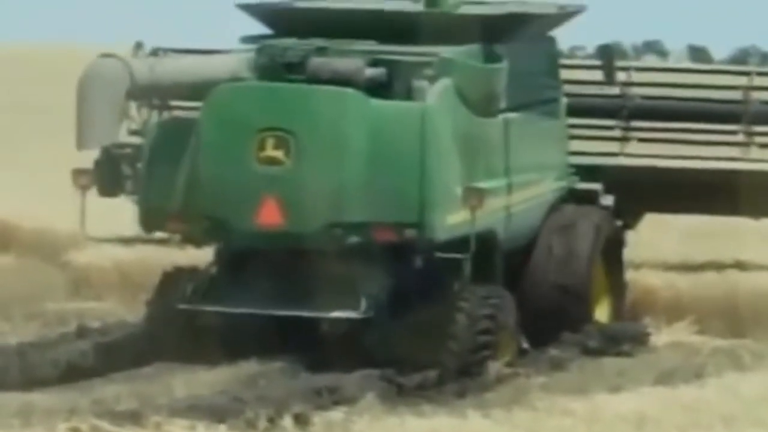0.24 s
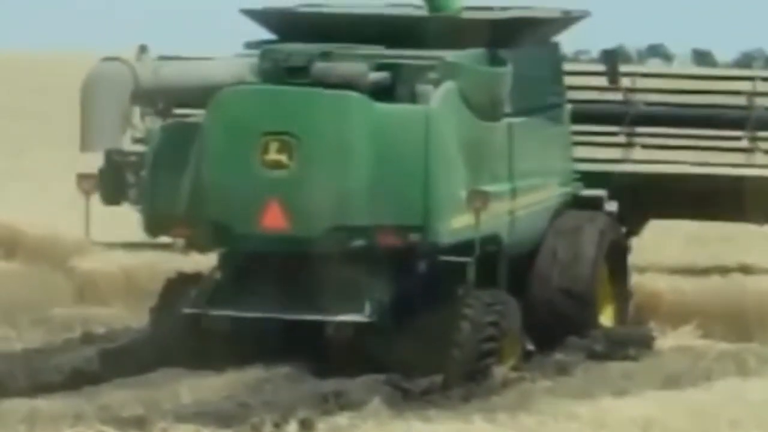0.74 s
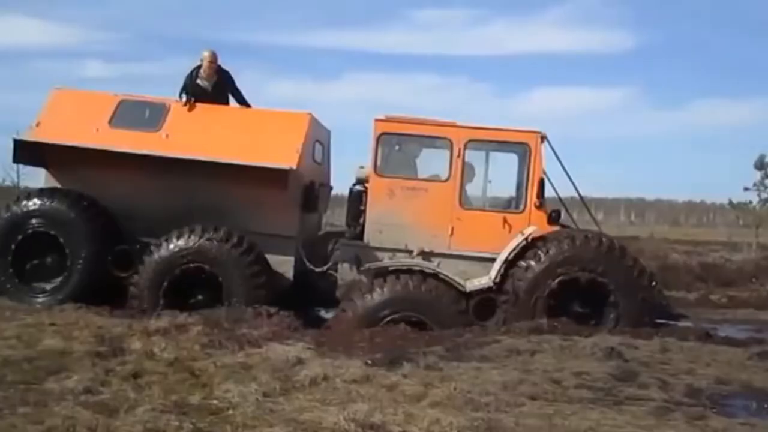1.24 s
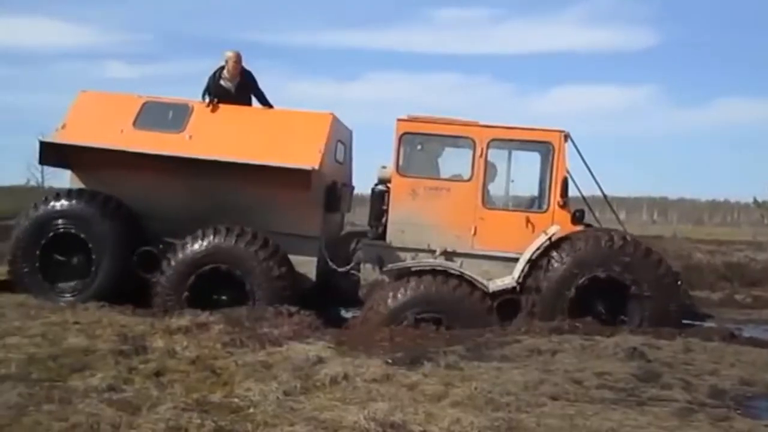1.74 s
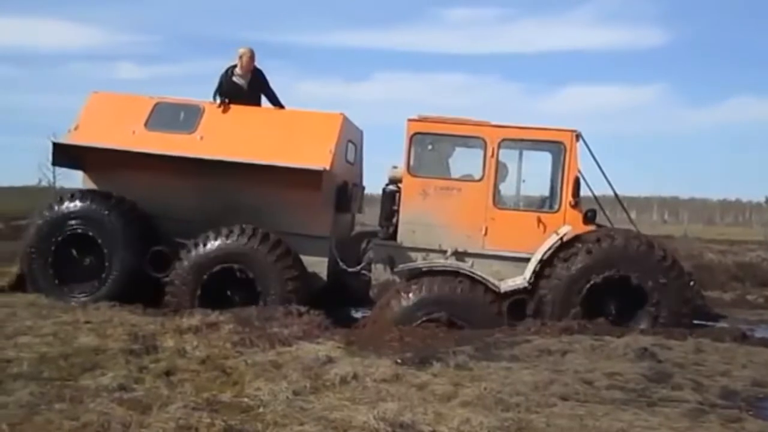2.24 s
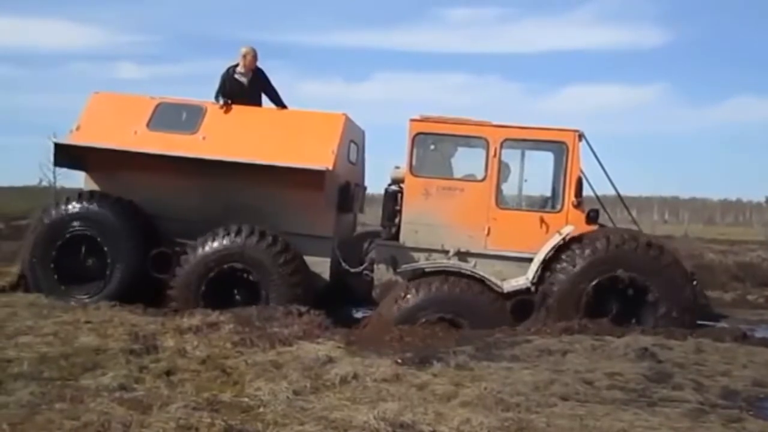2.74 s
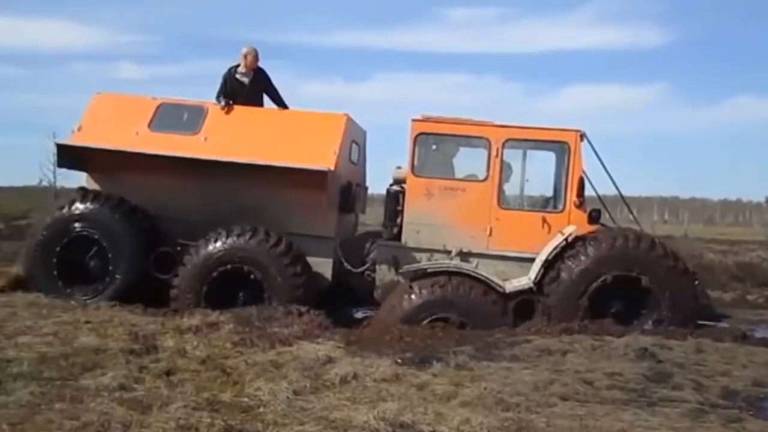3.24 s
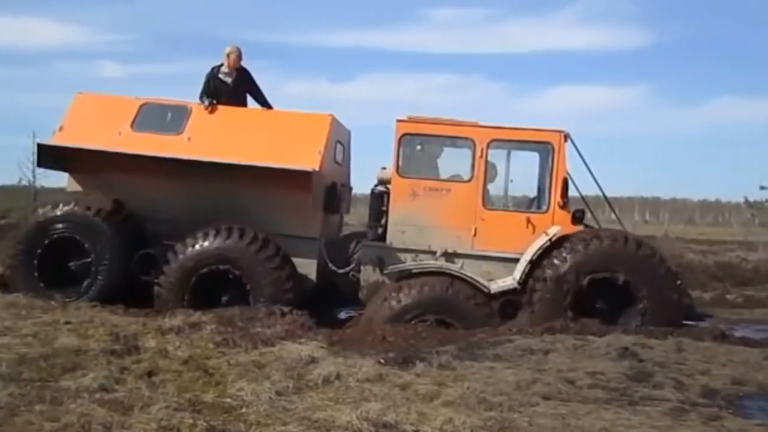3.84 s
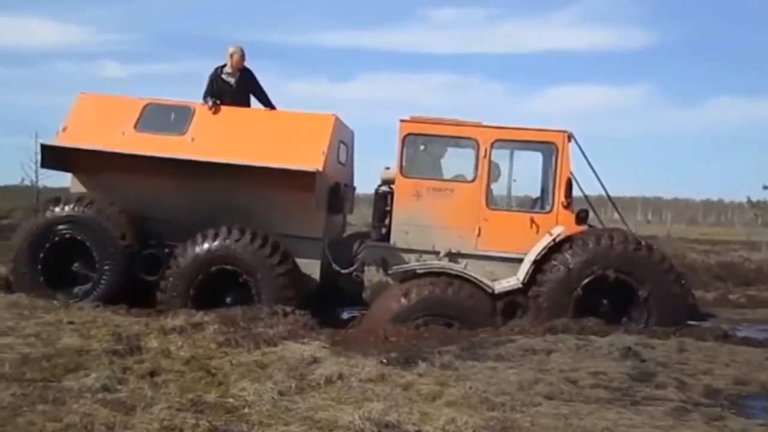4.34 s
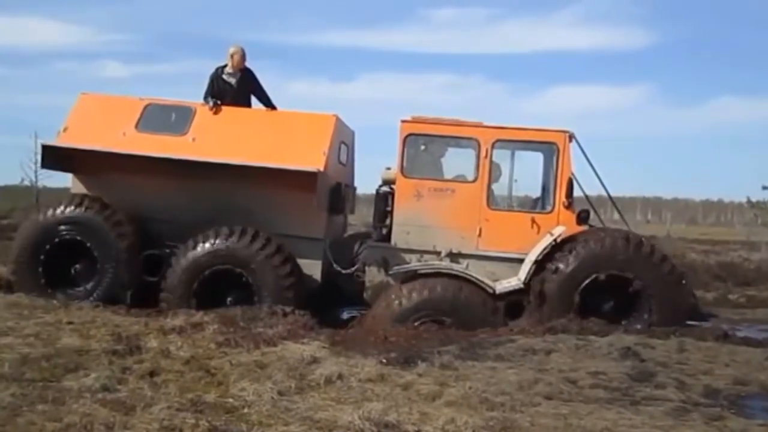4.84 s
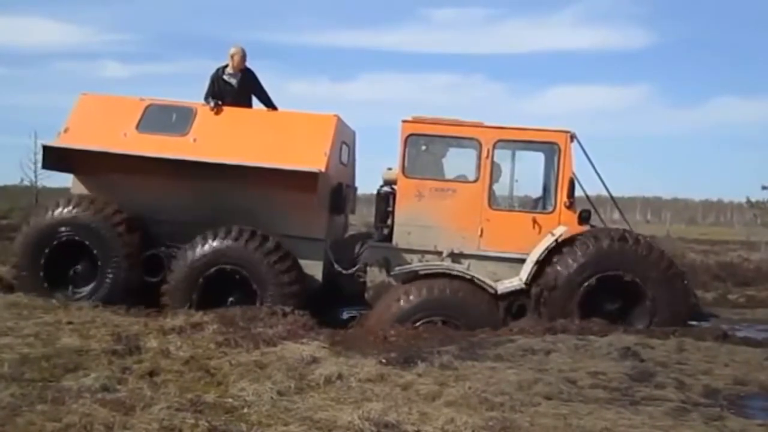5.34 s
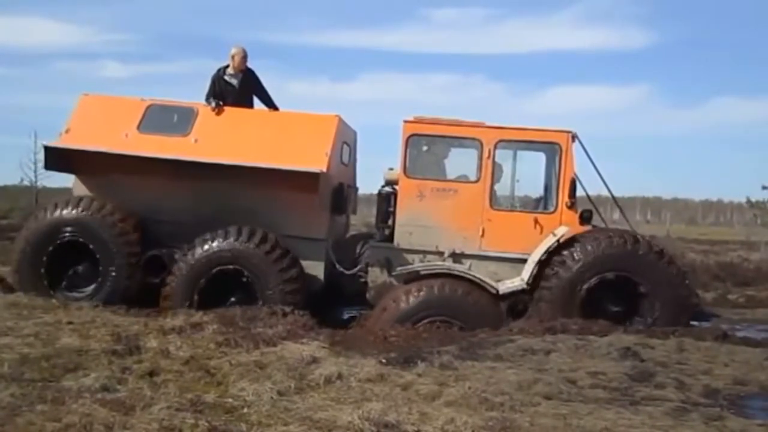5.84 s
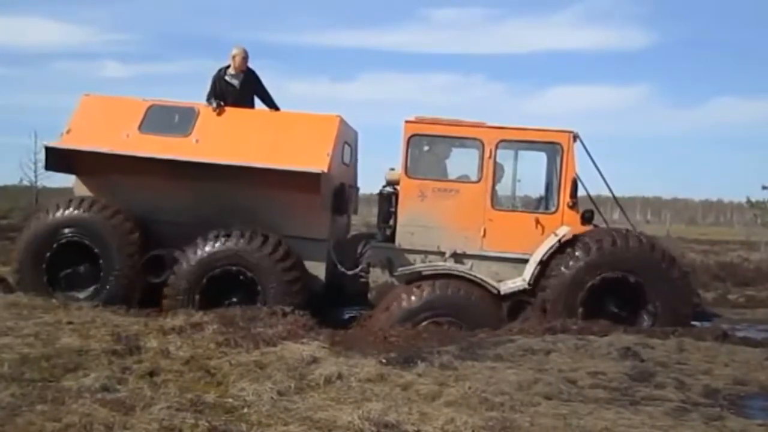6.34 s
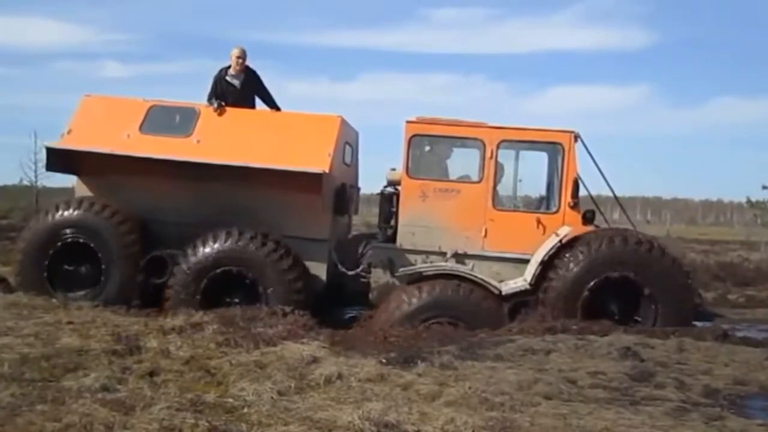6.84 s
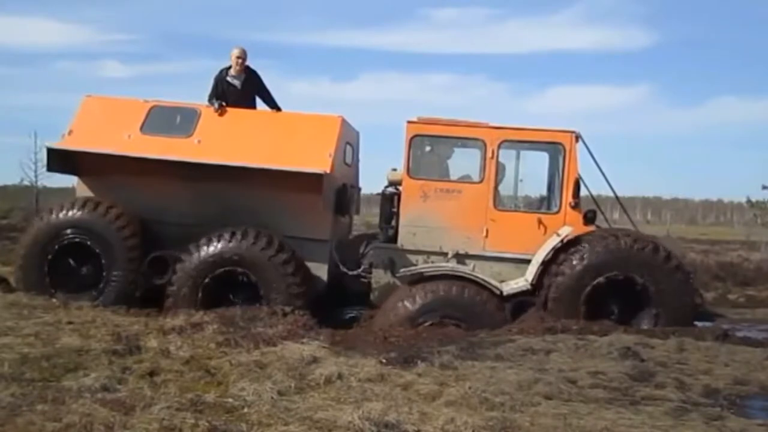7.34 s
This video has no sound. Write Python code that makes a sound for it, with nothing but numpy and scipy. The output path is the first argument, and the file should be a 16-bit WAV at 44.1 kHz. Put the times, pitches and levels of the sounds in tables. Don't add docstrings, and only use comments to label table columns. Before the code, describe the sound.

First, a dense, gritty, narrow-band roar of a heavy farm machine, rumbling without pause. A sudden cut with a thump brings a faint all-terrain vehicle engine outdoors, its revs rising, dipping, rising higher, then sagging under load. Hollow plastic knocks and small rattles on the camera stand out early, with low wind puffs and tiny mud spats. Later the level opens up and gusts batter the microphone port.

```python
import sys
import numpy as np
from scipy import signal
from scipy.fft import rfft, irfft, next_fast_len
from scipy.io import wavfile
from scipy.ndimage import uniform_filter1d, map_coordinates

SR = 44100
rng = np.random.default_rng(int(sys.argv[2]) if len(sys.argv) > 2 else 0)


def int16_out(signal):
    q = np.round(np.clip(np.atleast_2d(signal).T, -1, 1) * 32767)
    wavfile.write(sys.argv[1], SR, q.astype(np.int16))


def makeup_ratio(level_db):
    decades = np.asarray(level_db, float) / 20
    return 10 ** decades


N = 334703


def unit(x):
    return x / np.sqrt(np.mean(x ** 2) + 1e-20)


def along(points, hz):
    point_hz, point_db = np.transpose(points)
    return makeup_ratio(np.interp(np.log(hz + 1), np.log(point_hz + 1), point_db))


def curves(rows):
    time_s, *columns = np.transpose(rows)
    return [np.interp(np.arange(N) / SR, time_s, column) for column in columns]


def wobble(rate_hz):
    coarse = np.arange(0, N + 32, 32)
    knots = rng.standard_normal(int(N * rate_hz / SR) + 4)
    return np.interp(np.arange(N), coarse, map_coordinates(knots, [coarse * rate_hz / SR]))


def filtered(x, response):
    size = next_fast_len(N + 8192)
    return irfft(rfft(x, size) * response(np.fft.rfftfreq(size, 1 / SR)), size)[:N]


def modes(rows, hz):
    powers = [makeup_ratio(db) ** 2 / (1 + (2 * (hz - centre) / width) ** 2) ** 2 for centre, width, db in rows]
    return np.sqrt(sum(powers))


def noise(response):
    return unit(filtered(rng.standard_normal(N), response))


def steady(x, span_s):
    power = np.abs(uniform_filter1d(x ** 2, round(span_s * SR)))
    return x / np.sqrt(power + 1e-9)


def add(x, start_s, burst):
    part = x[round(start_s * SR):][:len(burst)]
    part += burst[:len(part)]


# pitch_hz, level_db per Hz
PORT = [(12, -48), (20, -6), (64, 4.5), (97, 3), (129, 2.5), (330, -6), (687, -26), (780, -41), (900, -21),
        (1170, -54), (1980, -120)]
# pitch_hz, level_db per Hz
WHIP = [(60, -60), (120, -13), (250, 13), (500, -16), (800, -20), (1300, -34), (3000, -120)]
# start_s, level_db, hold_s
GUSTS = [(1.222, -27, .005), (1.498, -31, 0.11), (1.75, -43, .25), (2.15, -41, .3), (3.9, -37, .35),
         (5.575, -27, .01), (5.708, -26, 0.057), (5.85, -27, .12), (6.0, -30, 0.11), (6.182, -24, .01),
         (6.335, -23, 0.03), (6.444, -22.5, 0.17), (6.667, -22, 0.043), (6.76, -24, .03), (7.22, -36, .2),
         (7.5, -34, .05)]
# start_s, peak_db, pitch_hz
THUMPS = [(1.246, -32, 201), (1.261, -29, 190), (1.274, -26, 150), (1.294, -24, 130), (2.125, -21, 40),
          (2.526, -17, 36), (4.21, -17, 40), (6.757, -7.5, 177), (2.115, -17.5, 61.9), (2.149, -17.5, 95),
          (2.218, -20.5, 61.5), (2.328, -18.5, 86.1), (2.533, -12, 76.5), (2.551, -19, 122),
          (2.662, -18.5, 142), (2.739, -25, 136), (4.19, -24, 61.9), (4.262, -8.5, 128), (4.287, -11, 90),
          (5.122, -18, 81.5), (5.839, -7, 132), (6.321, -15, 125)]
RISE_DB_PER_S, FALL_DB_PER_S, CALM_DB = 205, 172, -45


def gust_level(start_s, db, hold_s):
    climb_s, fall_s = (db - CALM_DB) / RISE_DB_PER_S, (db - CALM_DB) / FALL_DB_PER_S
    end_s = start_s + hold_s
    corners_s = [start_s - climb_s, start_s, end_s, end_s + fall_s]
    return np.interp(np.arange(N) / SR, corners_s, [CALM_DB, db, db, CALM_DB])


def wind():
    port = lambda hz: along(PORT, hz)
    gust_db = np.max([gust_level(*gust) for gust in GUSTS], axis=0)
    breeze_db = .81 * (curves(GAIN)[0] + 35) - 38 + 1.84 * wobble(2.97)
    x = makeup_ratio(breeze_db) * unit(makeup_ratio(1.7 * wobble(18)) * noise(port))
    x += makeup_ratio(gust_db - 1) * steady(makeup_ratio(3 * wobble(90)) * noise(port), span_s=.066)
    lumps = makeup_ratio(2.4 * wobble(110)) * noise(lambda hz: along(WHIP, hz))
    x += makeup_ratio(1.95 * (gust_db + 19) - 27) * steady(lumps, span_s=.07)
    t, air = np.arange(SR // 5) / SR, steady(noise(port), span_s=.028)
    for start_s, db, hz in THUMPS:
        push = -np.sin(2 * np.pi * hz * t) + makeup_ratio(-9) * air[round(start_s * SR):][:len(t)]
        t60_s = .066 + 1.8 / hz
        add(x, start_s, makeup_ratio(db - 60 * t / t60_s) * (1 - np.exp(-t / .006)) * push)
    return x


# start_s, peak_db, way (push 1
SNAPS = [(5.553, -18, -1), (5.5656, -18, -1), (5.5773, -16, 1), (5.6955, -14, -1), (5.7182, -13, 1),
         (5.7339, -16, -1), (5.8439, -15, -1), (5.8575, -15, -1), (5.9347, -11, -1), (5.9959, -13, -1),
         (6.0572, -15, -1), (6.1244, -11, 1), (6.1541, -12, 1), (6.3149, -6, 1), (6.3408, -12, 1),
         (6.3566, -10, 1), (6.4603, -8, 1), (6.4726, -7, 1), (6.4979, -9, 1), (6.5273, -8, -1),
         (6.5637, -8, 1), (6.5963, -7, 1), (6.6149, -6, -1), (6.6462, -10, 1), (6.6673, -11, 1),
         (6.6843, -10, 1), (6.6986, -11, 1), (6.7683, -12, -1), (6.8669, -15, -1), (6.8821, -16, -1),
         (6.9144, -14, -1), (7.024, -17, 1), (7.0443, -15, -1), (7.141, -10, -1), (7.218, -15, -1),
         (7.2686, -13, -1), (7.3105, -14, 1), (7.3308, -13, -1), (7.4565, -12, -1), (7.4878, -12, -1),
         (7.515, -13, 1), (7.5292, -11, 1), (7.5611, -14, 1), (7.5874, -15, -1)]


def snaps():
    x, t = np.zeros(N), np.arange(SR // 20) / SR - .015
    for start_s, db, way in SNAPS:
        u = t * makeup_ratio(.4 * (db + 12))
        shape = np.exp(np.minimum(u / .0018, -u / .004))
        add(x, start_s + t[0], np.sign(way) * makeup_ratio(db + .5) * shape * np.cos(2 * np.pi * 140 * u))
    return x


# start_s, peak_db, first_pitch_hz
LICKS = [(5.856, -21, 500), (5.884, -22, 556), (5.894, -26, 450), (6.123, -22, 656), (6.352, -25, 450),
         (6.3115, -26, 580), (6.445, -31, 594), (6.504, -17, 597), (6.521, -17, 910), (6.559, -16, 800),
         (6.585, -19, 740), (6.608, -23.5, 1160), (6.644, -21, 666), (6.677, -25, 760), (6.718, -22, 550)]
LICK_S, LICK_END_HZ = .0075, 294


def licks():
    x, u = np.zeros(N), np.arange(round(LICK_S * SR)) / (LICK_S * SR)
    for start_s, db, hz in LICKS:
        phase = 2 * np.pi * np.cumsum(hz * (LICK_END_HZ / hz) ** u) / SR
        add(x, start_s - LICK_S * .25, makeup_ratio(db) * np.sin(np.pi * u) * np.sin(phase))
    return x


# start_s, peak_db
SPATTER = [(1.5308, -34), (1.537, -22.5), (1.6488, -49), (2.3466, -38), (2.588, -32.5), (2.785, -42),
           (3.154, -44), (3.181, -30), (3.213, -27.5), (3.4176, -29.5), (4.0916, -34), (4.8487, -25.5),
           (4.9308, -21.5), (5.278, -23), (5.4072, -27), (5.6065, -25.5), (5.714, -24), (5.77, -24.5),
           (5.86, -27.5), (5.9226, -16.5), (6.222, -21), (7.1672, -22.5), (7.388, -27.5)]


def spatter():
    x, t = np.zeros(N), np.arange(SR // 10) / SR
    for start_s, db in SPATTER:
        decay = makeup_ratio(db - 12.5 - 60 * t / .12) + makeup_ratio(db - 2.5 - 60 * t / .0053)
        add(x, start_s, decay * (1 - np.exp(-t / .00063)) * rng.standard_normal(len(t)))
    return filtered(x, lambda hz: along([(1500, -9), (4000, 5), (9000, -.5), (14000, -17)], hz))


def ring_down(t, hz, db, t60_s, rise_s, lag=0):
    swing = np.cos(2 * np.pi * hz * (t - 1.164 * rise_s) - lag)
    return makeup_ratio(db - 60 * t / t60_s) * (1 - np.exp(-t / rise_s)) * swing


# start_s, peak_db, low_modes_db, hardness (0-1)
KNOCKS = [(1.219, -7.5, -7, .5), (1.2347, -14, -3, 0), (1.5015, -16.5, 12, 0.1), (1.507, -4.5, 3, -.15),
          (1.537, -10, -19, 0.2), (1.544, -13.5, -14, 0.1), (1.555, -17.5, 13, 0.3), (1.5598, -15, 2, 0.4),
          (1.658, -27.5, 7, 0.9), (1.731, -22.5, -11, 0.1), (2.135, -25, 12, 0), (2.264, -35, 18, 0.2),
          (2.502, -24, 11, 0.4), (2.589, -22.5, -3, 0.8), (3.0988, -10, -1, 0.89), (3.209, -19, 8.5, 0.8),
          (3.6723, -14, -1, .9)]
# pitch_hz, level_db, share of t60
CASE_LOW = [(125.4, -3, 1.16), (190, -17, 2.2)]
# pitch_hz, share of t60
CASE_MID = (236, 0.93)
# pitch_hz, level_db, share of t60
CASE_HIGH = [(320, 8.5, 1.3), (380, 0, 0.74), (498, -15, 0.81), (602, -9.5, 0.98), (722, 7, 0.62),
             (950, 0.5, 0.46), (1103, -5, 1.5), (1430, -6, 0.76), (1700, -17.5, 0.75), (2080, -11, 0.96),
             (2470, -17, 0.36)]
# pitch_hz, level_db per Hz
RATTLE = [(80, -28.5), (200, 1.5), (900, -14.5), (2500, -16), (4000, -25), (8000, -27.5), (12000, -34.5),
          (15000, -55)]


def knocks():
    x, loose, t = np.zeros(N), np.zeros(N), np.arange(SR // 5) / SR
    for start_s, db, low_db, hard in KNOCKS:
        upper_db, rattle_db = -24.5 + 9.5 * hard, -32.5 + 13 * hard
        t60_s = .075 + .001 * db
        rise_s = np.clip(.0005 * makeup_ratio(-upper_db - 11.5), .0004, .003)
        body = ring_down(t, CASE_MID[0], -.45, t60_s * CASE_MID[1], rise_s)
        for hz, level_db, share in CASE_LOW:
            body += ring_down(t, hz, low_db + level_db, t60_s * share, rise_s, lag=1)
        upper = np.zeros(len(t))
        for hz, level_db, share in CASE_HIGH:
            detune, spread_db = 1 + .025 * rng.standard_normal(), rng.normal(0, 2)
            mode_db = upper_db + level_db + spread_db
            upper += ring_down(t, hz * detune, mode_db, t60_s * share * .7, rise_s, spread_db / 3)
        start_s = start_s - 1.5 * rise_s
        add(x, start_s, -makeup_ratio(db - 12) * np.hanning(round(.003 * SR)))
        add(x, start_s + .00319, makeup_ratio(db + 2.5) * (body + upper))
        add(x, start_s + .00303 + .0078, makeup_ratio(db + 3.5) * upper)
        shake = makeup_ratio(db + rattle_db + 29 - 60 * t / (.45 * t60_s))
        add(loose, start_s + .0027, shake * rng.standard_normal(len(t)))
    return x + filtered(loose, lambda hz: along(RATTLE, hz))


# start_s, level_db, pitch_hz, t60_s
CLINKS = [(1.221, -21, 990, 0.066), (1.5555, -23.5, 824, .05), (1.556, -26, 1495, 0.057),
          (1.557, -28.5, 1200, 0.058), (1.558, -35, 1700, 0.036), (1.561, -29.5, 950, 0.061),
          (2.59, -27.5, 777, 0.064), (3.1005, -26.5, 2080, .018), (3.102, -24, 1446, 0.02),
          (3.105, -23, 764, 0.025), (3.119, -18.5, 920, 0.027), (3.216, -25.5, 946, 0.041),
          (3.675, -29, 2044, .04), (3.682, -19.5, 712, 0.041), (6.378, -21.5, 1300, 0.035),
          (6.447, -18, 1313, 0.054)]


def clinks():
    x, t = np.zeros(N), np.arange(SR // 8) / SR
    for start_s, db, hz, t60_s in CLINKS:
        drift = np.cumsum(rng.standard_normal(len(t))) * .07
        envelope = makeup_ratio(db - 60 * t / t60_s) * (1 - np.exp(-t / .0011))
        add(x, start_s, envelope * np.sin(2 * np.pi * hz * t + drift))
    return x


# start_s, length_s, pitch_hz, level_db
CHIRPS = [
    (0.00194, 0.074, 2200, -38.5),
    (.55, 0.12, 3000, -47.5),
    (.8, .12, 2710, -49),
    (1.1, .1, 3000, -50),
    (.2, .1, 2360, -58),
    (0.077, 0.079, 2500, -44),
]


def chirps():
    x = np.zeros(N)
    for start_s, length_s, hz, db in CHIRPS:
        t = np.arange(round(length_s * SR)) / SR
        add(x, start_s, makeup_ratio(db) * np.sqrt(np.sin(np.pi * t / length_s)) * np.sin(2 * np.pi * hz * t))
    return x


def wavering(rows, swing_db):
    x = np.zeros(N)
    for hz, wander_hz, db in rows:
        phase = 2 * np.pi * np.cumsum(hz + wander_hz / 2 * wobble(30)) / SR
        x += makeup_ratio(db + 3 + swing_db * wobble(23)) * np.sin(phase)
    return x


# order, level_db, lag in radians
DRUM = [(2, -16, 2.3), (3, -21, 6), (4, -40, 4.8), (5, -36, .9), (6, -15, 3.3), (7, -37, 5.7),
        (8, -27, 2.2), (10, -38, 3.8), (12, -22.5, 4), (15, -33, .5), (18, -27, 4), (20, -35, 5.7),
        (24, -34, 4.5)]
# pitch_hz, wander_hz, level_db
ROTOR = [(77.9, .5, -23), (118.5, .7, -29), (163.6, .8, -28), (179.9, 1, -32)]
# pitch_hz, wander_hz, level_db
WHINE = [(328.4, 2.5, -35), (401, 6, -43), (538.5, 14, -43), (694, 16, -44), (872.5, 2, -34.5),
         (1055, 10, -51), (1206, 10, -51), (1384, 10, -52), (1330, 8, -55), (1615, 8, -52), (1701, 8, -56),
         (1787, 8, -57), (1981, 10, -55), (2213, 10, -54), (2444, 14, -59), (2713, 5, -54), (3112, 8, -61)]
# pitch_hz, level_db per Hz
RUMBLE = [(8.8, -24.5), (15, 2), (27, -8.5), (49, -3), (135, -5.5), (173, -1), (210, -17.5), (298, -23.5),
          (330, -27), (430, -40), (730, -120)]
# pitch_hz, level_db per Hz
ROAR = [(120, -41), (200, 0), (280, -6), (450, -13), (690, -8.5), (770, -15.5), (900, -14), (1150, -18),
        (1500, -22.5), (2050, -22), (2700, -24.5), (3590, -33.5), (3880, -31), (4300, -63.5)]
# start_s, level_db
SURGES = [
    (.4855, .18),
    (.690, .03),
]
DRUM_HZ = 7.277


def harvester():
    turn = 2 * np.pi * DRUM_HZ * np.arange(N) / SR + .006 * wobble(8)
    beat = sum(makeup_ratio(3 + db + .52 * wobble(4.7)) * np.sin(order * turn - lag) for order, db, lag in DRUM)
    pumping = 1 + .42 * np.cos(6 * turn)
    rumble = makeup_ratio(-18.5) * pumping * steady(noise(lambda hz: along(RUMBLE, hz)), span_s=.067)
    roar = makeup_ratio(-26.5 + .67 * wobble(40) + 1.1 * wobble(300)) * noise(lambda hz: along(ROAR, hz))
    low = beat + rumble + wavering(ROTOR, swing_db=1.2)
    low = low / (1 + np.abs(low / .95) ** 4) ** (1 / 4)
    swing = np.hanning(round(.008 * SR))
    for start_s, db in SURGES:
        under = low[round((start_s - .004) * SR):][:len(swing)]
        add(low, start_s - .004, -swing * (makeup_ratio(db) + under))
    x = low + roar + wavering(WHINE, swing_db=2.1) + chirps()
    floor = makeup_ratio(-88) * rng.standard_normal(N)
    return filtered(x, lambda hz: 1 / (1 + (hz / 3800) ** 40)) + floor


# time_s, clatter_db
GAIN = [(1.63, -45.5), (2.54, -42.5), (3.37, -40), (3.72, -37), (4.5, -34), (4.88, -32), (5.6, -31),
        (6.06, -29.5), (6.44, -26.5), (6.76, -29.5), (7.44, -26), (7.59, -26)]
# time_s, firing_hz
SPEED = [(1.22, 59), (1.6, 67), (1.9, 75), (2.05, 77), (2.2, 75.8), (2.8, 67.4), (3.1, 67.8), (3.5, 70.1),
         (4.3, 79), (4.9, 83.9), (5.02, 84), (5.2, 79.8), (5.6, 70.2), (5.8, 67.1), (6.1, 64.2),
         (6.7, 61.7), (7, 62.1), (7.59, 64.6)]
# firing order, level_db over the base of its kind (below 2, half or whole order)
UPPER = [(.5, -16), (1.5, -11), (2.5, -10), (3, -9), (4, -10), (4.5, -17), (5, -20), (5.5, -21), (6, -19),
         (6.5, -19)]
# pitch_hz, width_hz, level_db
PANELS = [(325, 38, -6), (448, 100, 3), (633, 54, -3), (773, 54, 4), (907, 15, 1.5), (972, 30, -1),
          (1066, 170, 1), (1360, 40, -3.5), (1387, 264, -1.5), (1638, 41, -2.5), (1893, 57, -2),
          (2008, 73, -2.5), (2300, 77, -6), (2403, 140, -5.5), (2806, 90, -5.5), (3085, 150, -11),
          (3330, 76, -8.5), (3695, 54, -7), (4074, 85, -10.5)]
# pitch_hz, level_db per Hz
BLOCK = [(32, -31), (55, -12.5), (144, -6.5), (200, -17), (447, -12.5), (519, -15), (1080, -8), (1260, -21),
         (1440, -10.5), (1770, -14.5), (2000, -16), (2150, -16), (2400, -19), (5000, -26), (6500, -62),
         (11000, -120)]
# pitch_hz, level_db per Hz
HISS = [(1470, -33.5), (2170, -18.5), (2500, 2.5), (3490, -12.5), (3790, -5), (8660, -13), (10000, -13),
        (14300, -25.5), (14900, -40), (15300, -73)]
# pitch_hz, width_hz, level_db over the hiss
RINGS = [(3675, 50, 5), (5600, 60, 4), (6480, 15, 10), (7690, 45, 4), (7914, 22, 3), (8365, 27, 1),
         (9345, 22, 2), (10330, 40, 1)]
# pitch_hz, level_db per Hz
BELT = [(1800, -5.5), (3500, -0.5), (5700, 0), (6900, -4), (8600, -2), (11000, -10.5), (14500, -21)]
# time_s, comb_spacing_hz, strength (0-1)
BOUNCE = [(1.3, 2850, .2), (2.6, 2950, .3), (3.0, 2720, .35), (3.25, 2500, .35), (3.45, 2830, .6),
          (3.72, 3030, .6), (4.05, 2850, .55), (4.25, 2650, .45), (4.55, 2480, .55), (4.7, 2620, .55),
          (4.8, 2840, .6), (5.12, 2850, .55), (5.3, 2900, .15), (6.8, 3100, .1), (7.05, 3200, .3),
          (7.59, 3200, .3)]
# time_s, pitch_hz, level_db
PUMP = [
    (2.4, 89.8, -68),
    (2.7, 90.2, -59),
    (3.4, 92.3, -47),
    (3.8, 98.6, -48),
    (4.1, 91.4, -64),
]


def firing_orders(speed_hz, revs, throttle):
    first_db = -1.5 - .4 * np.maximum(revs - 2, 0)
    second_db = np.clip(-1 - .75 * revs, -9, -1)
    half_db = -2 - .7 * revs
    turn = 2 * np.pi * np.cumsum(speed_hz * (1 + .002 * wobble(20))) / SR
    firing_db = 1.6 * wobble(45) + 2.5 * np.clip(-throttle, 0, 1)

    def tone(order, db):
        level = makeup_ratio(db + 3 + firing_db + .8 * wobble(9))
        return level * np.cos(order * turn + 2.1 + .12 * wobble(15))

    orders = tone(1, first_db) + tone(2, second_db)
    for order, db in UPPER:
        base_db = first_db if order < 2 else half_db if order % 1 else -5
        orders += tone(order, base_db + db)
    return orders, turn


def marsh_engine():
    clatter_db, speed_hz = curves(GAIN)[0], curves(SPEED)[0]
    revs = speed_hz - 70
    throttle = np.tanh(uniform_filter1d(np.gradient(speed_hz) * SR, size=SR // 8) / 10)
    orders, turn = firing_orders(speed_hz, revs, throttle)
    uneven = 1 + .2 * np.cos(turn) + .1 * np.cos(turn / 2)
    panels = makeup_ratio(-3.5) * noise(lambda hz: modes(PANELS, hz)) + makeup_ratio(-4) * noise(lambda hz: along(BLOCK, hz))
    clatter = makeup_ratio(clatter_db) * (orders + makeup_ratio(.6 * wobble(9) + .25 * wobble(60)) * uneven * panels)

    air_db = clatter_db + .08 * revs + 1.5 * throttle
    hiss_db = air_db - 12 + 1.8 * wobble(12) + 1.7 * wobble(250)
    hiss = makeup_ratio(hiss_db) * uneven * noise(lambda hz: along(HISS, hz) * (1 + modes(RINGS, hz)))
    slip_db = 5 * np.clip((speed_hz - 81) / 1.6, 0, 1)
    belt = makeup_ratio(air_db - 13 + slip_db + .89 * wobble(9.8)) * noise(lambda hz: along(BELT, hz))

    spacing_hz, strength = curves(BOUNCE)
    echo = map_coordinates(belt + .45 * hiss, [np.arange(N) - SR / spacing_hz])
    combed = (hiss + belt + .75 * strength * echo) / np.sqrt(1 + strength ** 2)
    pump_hz, pump_db = curves(PUMP)
    pump = makeup_ratio(pump_db + 10) * np.sin(2 * np.pi * np.cumsum(pump_hz) / SR)
    return clatter + combed + pump


def scene():
    t = np.arange(N) / SR
    marsh = np.clip((t - 1.2172) / .0053, 0, 1)
    field = (1 - marsh) * np.clip(t / .006, 0, 1)
    flaps = snaps()
    port_open = 1 / (1 + 3 * np.abs(uniform_filter1d(np.abs(flaps), size=SR // 150)))
    outdoors = marsh_engine() + port_open * wind() + flaps + licks() + spatter()
    return (field * harvester() + marsh * outdoors + knocks() + clinks())[None]


def roll_off(x):
    return signal.sosfilt(signal.butter(12, 15440, fs=SR, output="sos"), x)


def record(dry):
    mix = filtered(np.clip(dry[0], -1, 1), lambda hz: hz < 14650)[None]
    return roll_off(mix)


dry = scene()
out = record(dry)
int16_out(out)
```